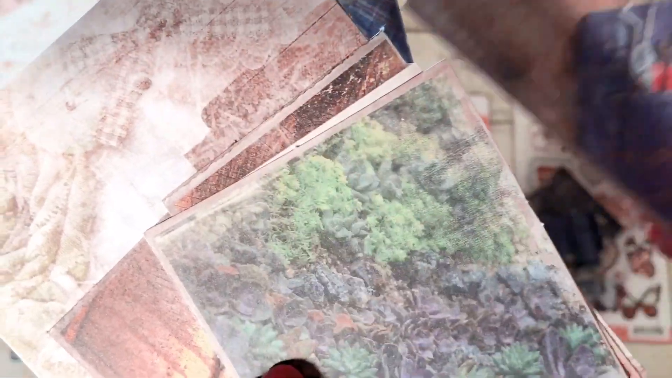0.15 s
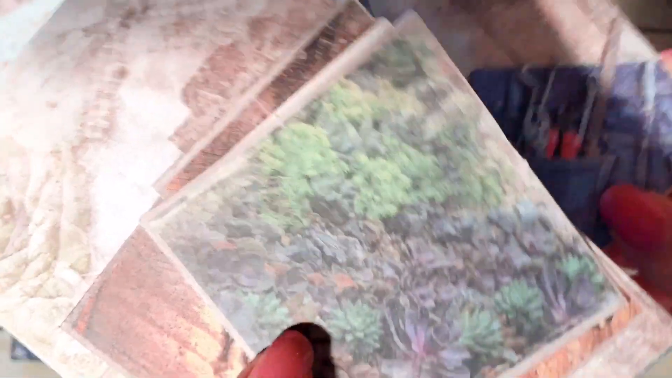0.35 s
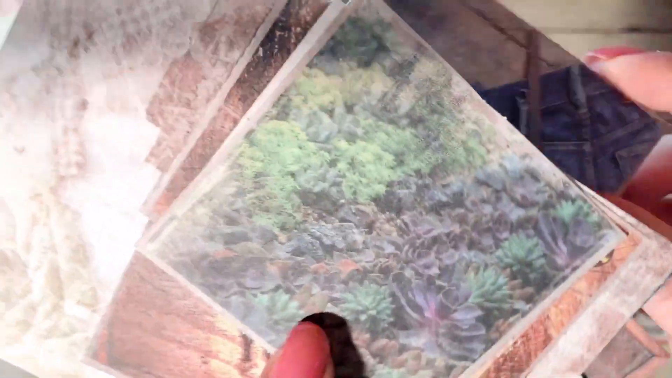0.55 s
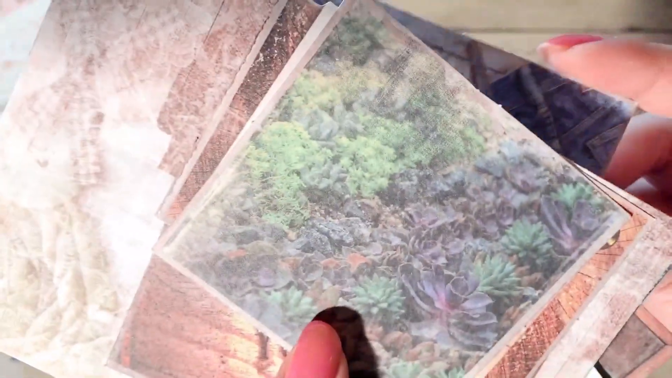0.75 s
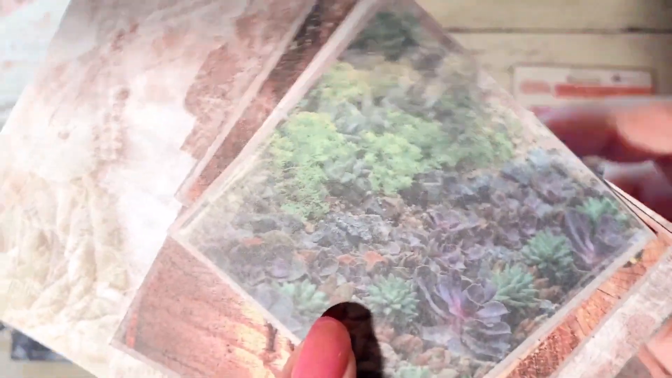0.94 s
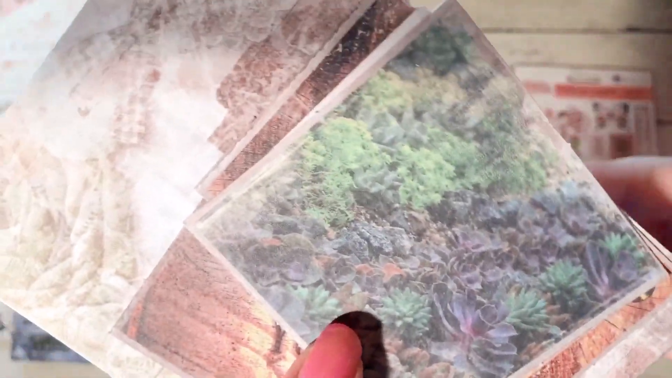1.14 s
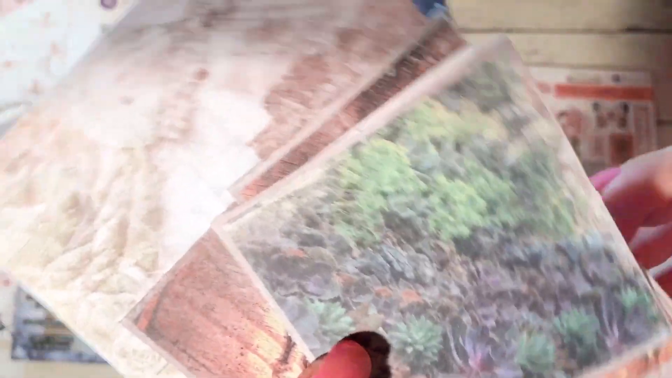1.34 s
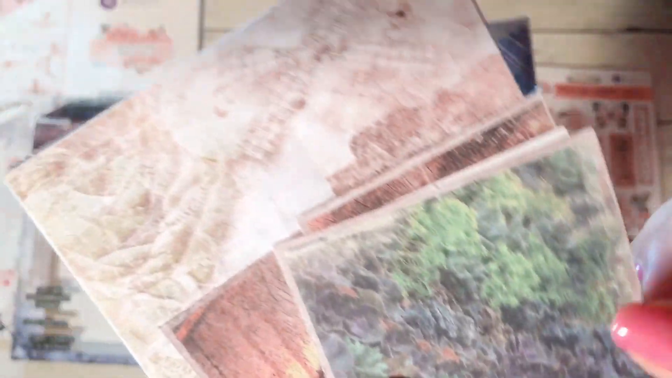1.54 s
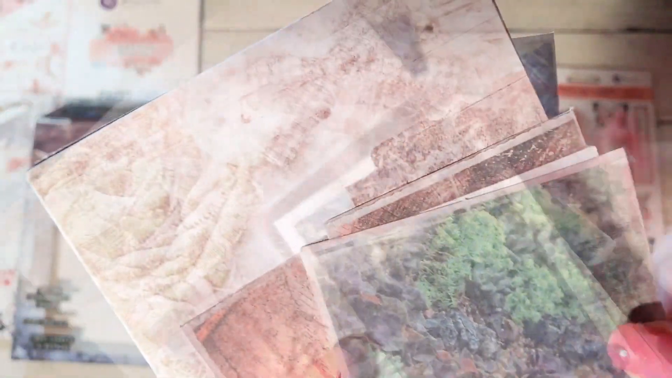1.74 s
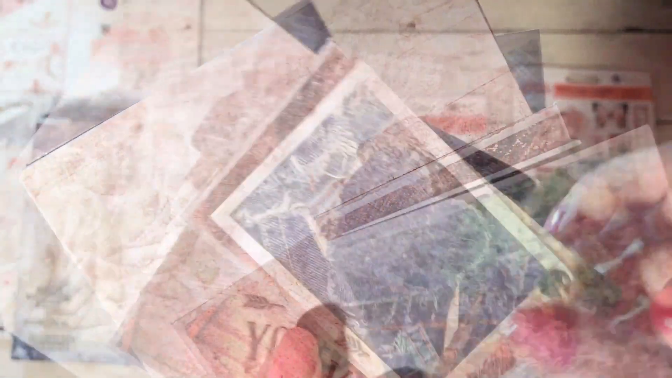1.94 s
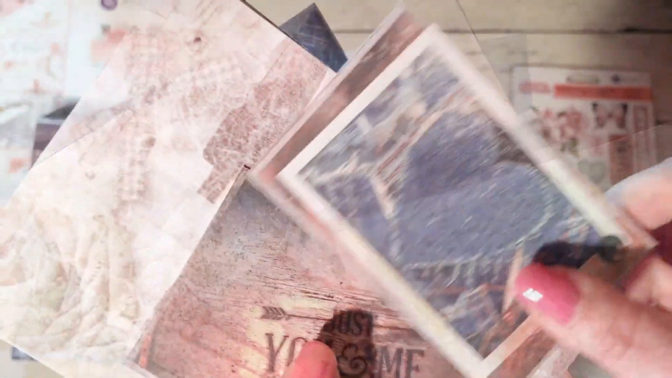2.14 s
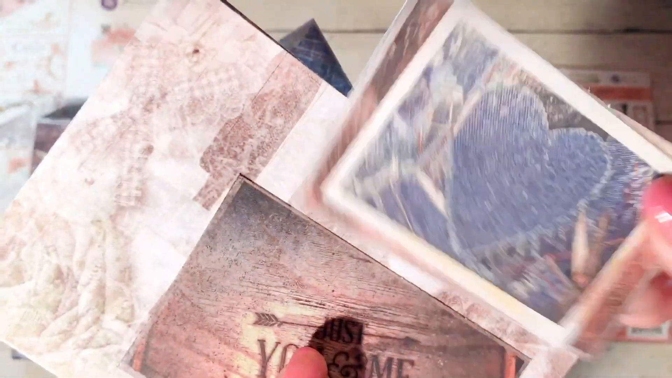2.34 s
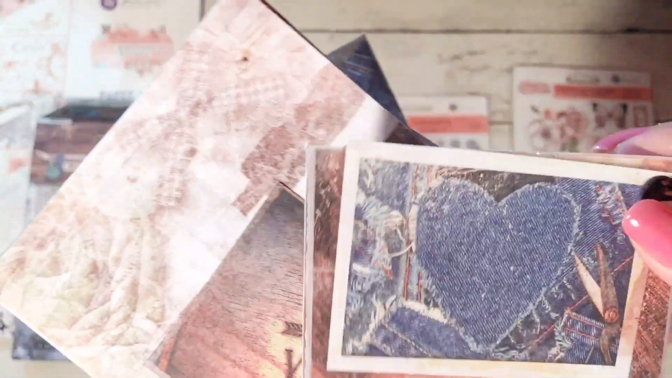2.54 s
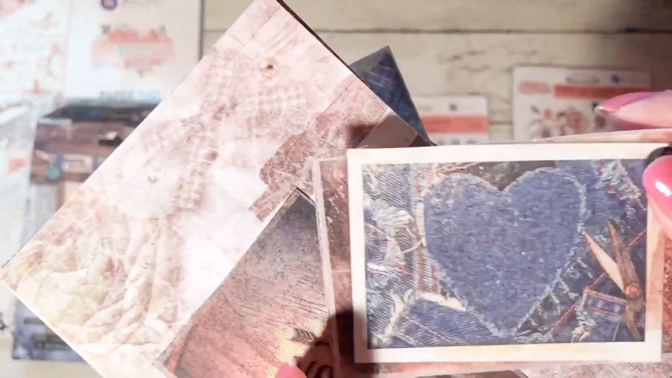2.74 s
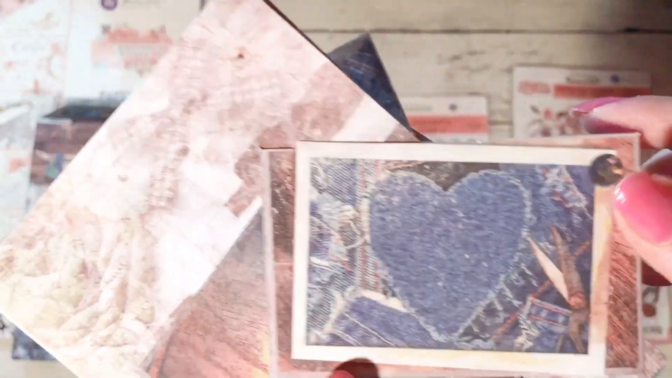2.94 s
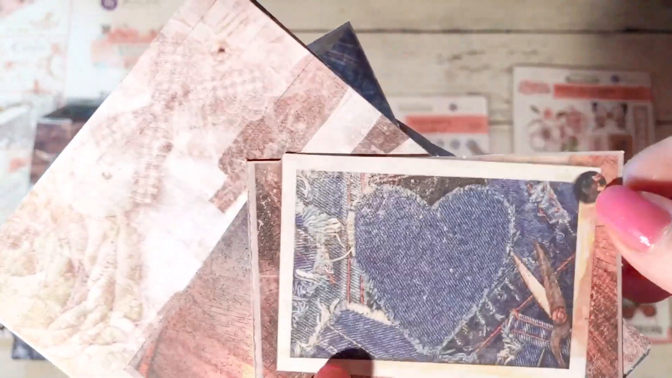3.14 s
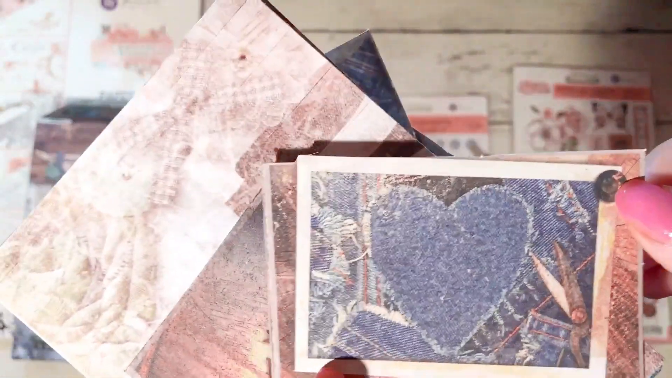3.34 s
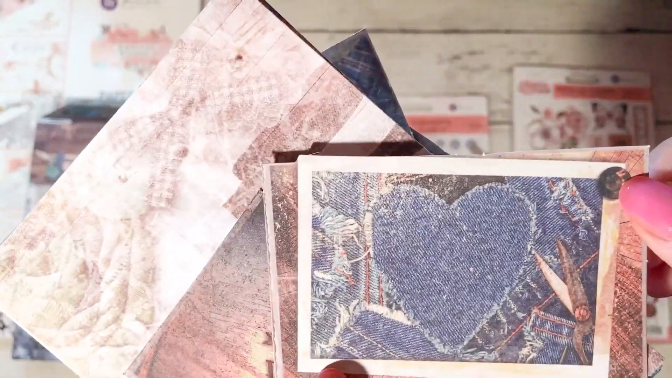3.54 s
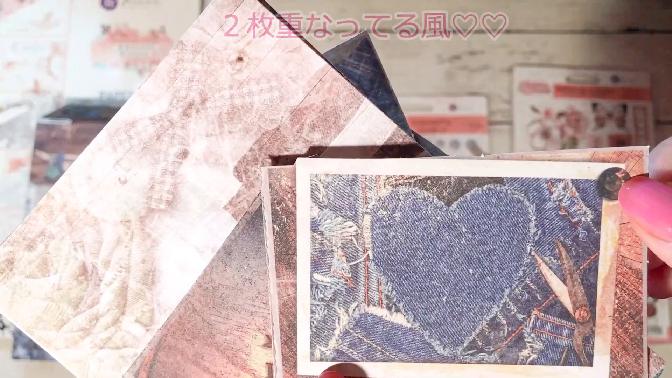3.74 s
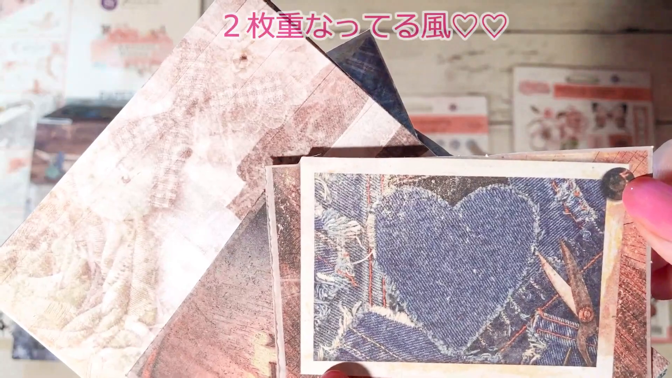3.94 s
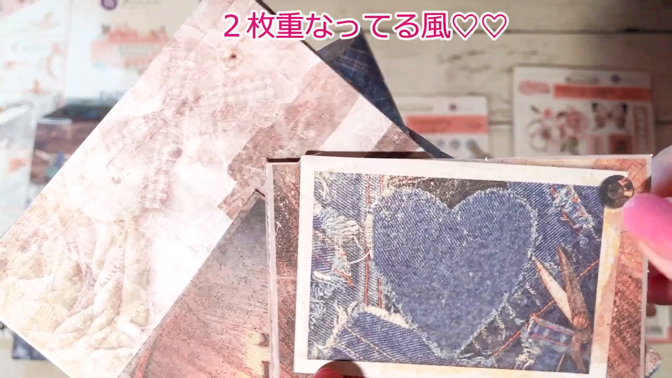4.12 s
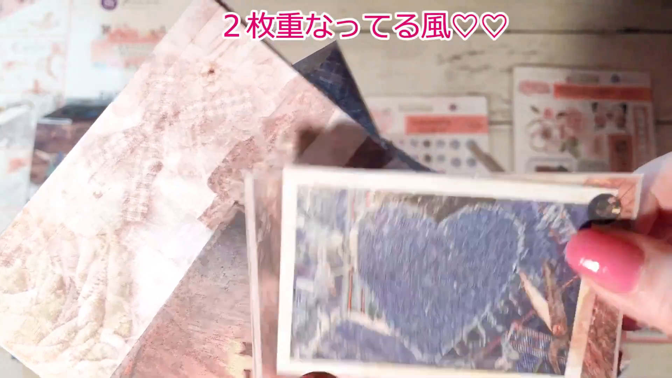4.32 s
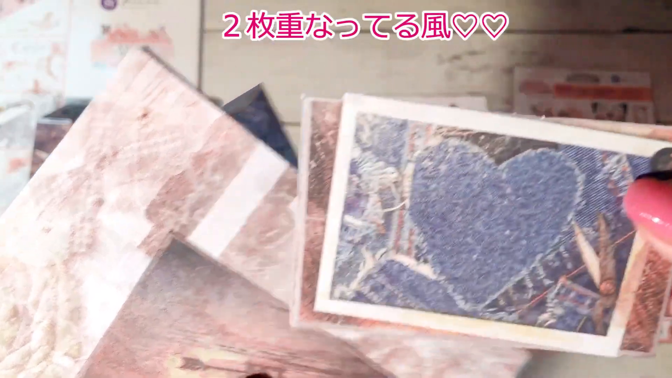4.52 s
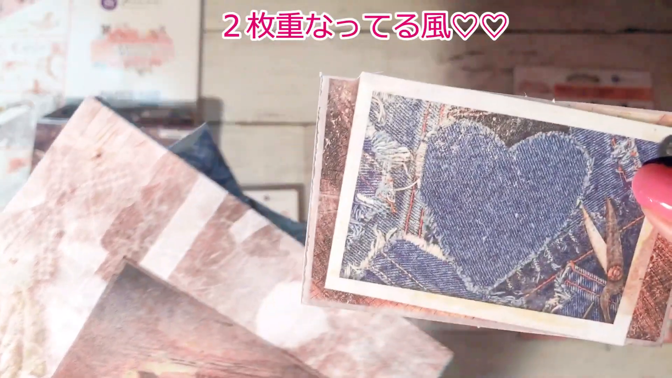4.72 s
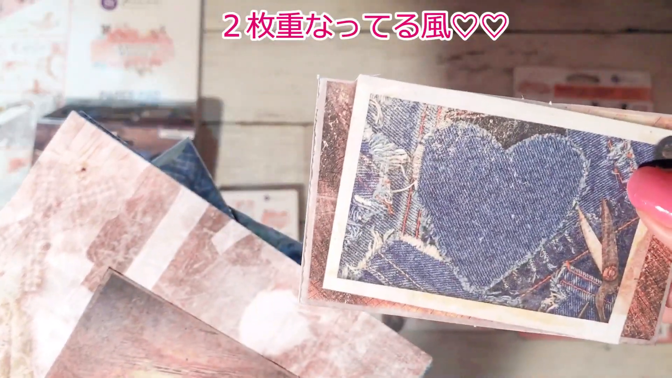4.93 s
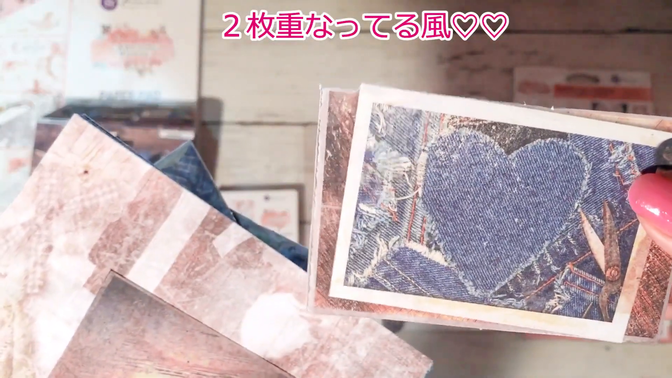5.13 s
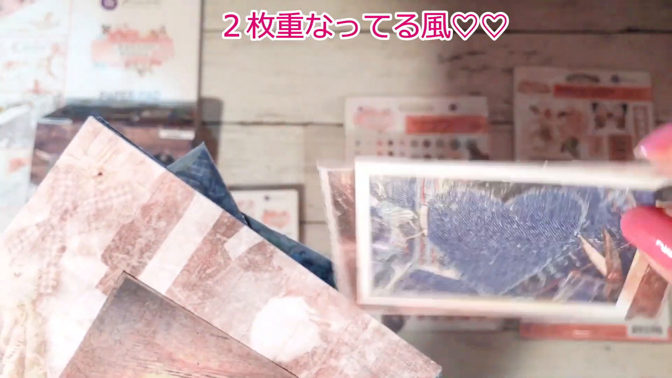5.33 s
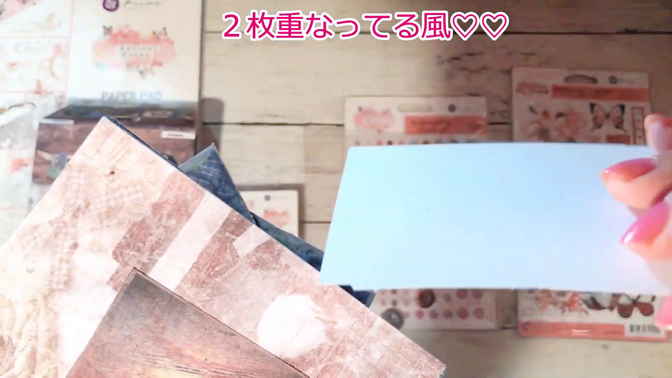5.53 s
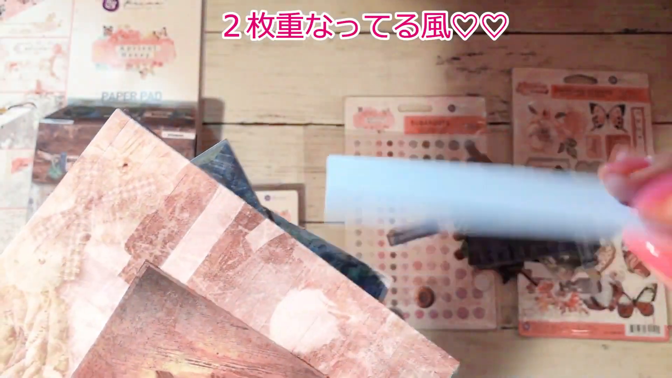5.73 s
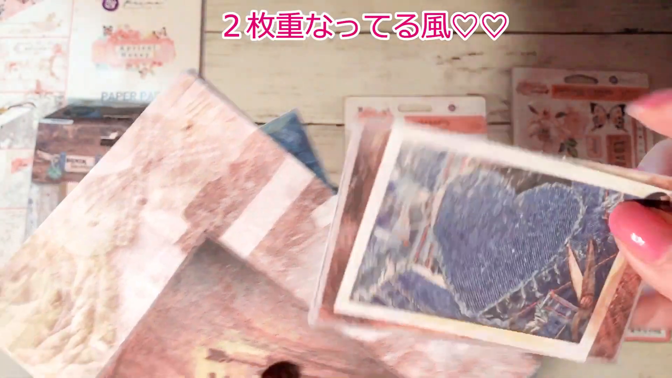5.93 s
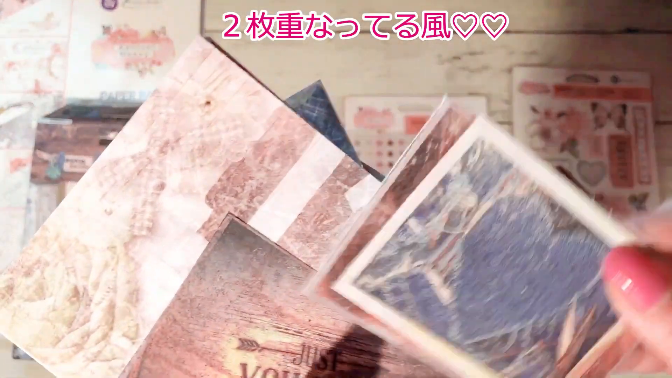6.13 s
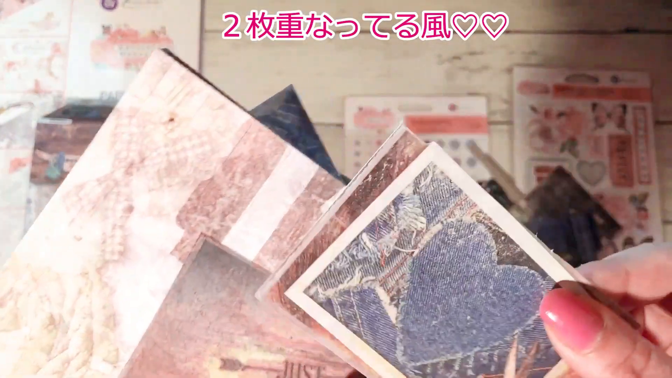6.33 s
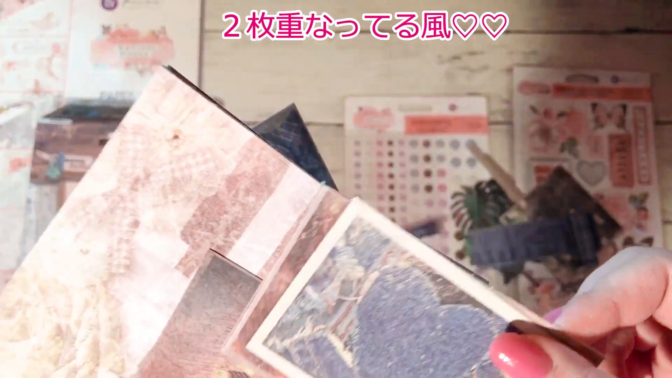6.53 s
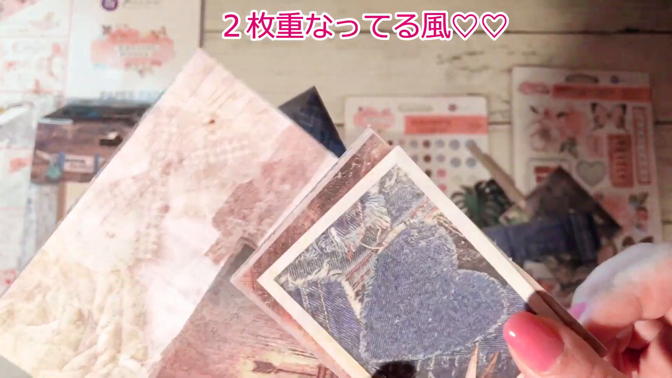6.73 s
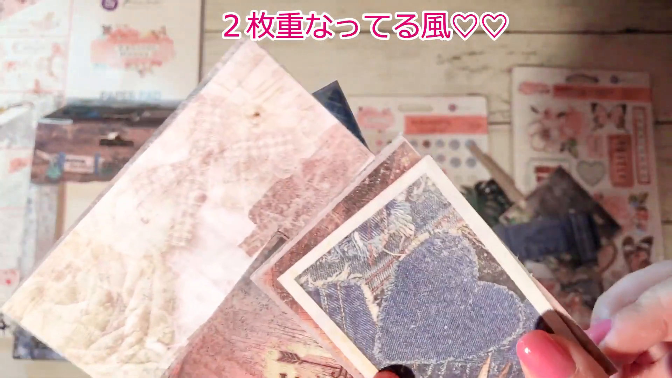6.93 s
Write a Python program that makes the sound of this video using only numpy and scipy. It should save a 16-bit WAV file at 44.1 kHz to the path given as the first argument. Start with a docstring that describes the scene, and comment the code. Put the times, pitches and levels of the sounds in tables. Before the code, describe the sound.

Close, dry handling of thick paper cards in a quiet room. Fingertips thump softly on the stack, and cards push between one another with small clicks. One swishes across another and corners spring free with crisp snaps. The handling drops to faint rubs, a brief scrape and a pause, then returns with light brushing, hissing slides, a sharp edge rasp and a few gentle taps.

```python
"""A few sheets of stiff card, fanned, slid and turned over by hand, close to the microphone in a small
quiet room. Rubbing fibres send dense tiny slips into the card; corners that flick free, edges that catch
and fingertips that bump send single impulses. All travel as bending waves, treble first and bass last,
and come back from the edges of the sheet. Desk and walls add a short tail over a low room tone."""
import sys
import numpy as np
from scipy import signal
from scipy.fft import rfft, irfft, next_fast_len
from scipy.io import wavfile

SR = 44100
rng = np.random.default_rng(int(sys.argv[2]) if len(sys.argv) > 2 else 0)


def put_to_file(sound):
    """Save the sound as 16-bit audio at rate SR, in the file named by the first command-line argument."""
    columns = np.atleast_2d(sound).T  # one column per channel
    safe = np.clip(columns, -1, 1)
    whole_steps = np.round(safe * 32767)
    wavfile.write(sys.argv[1], SR, whole_steps.astype(np.int16))


N = 311787
SHEET_SAMPLES = 4096  # length of the card's impulse response


def undb(db):
    """Decibels to gain."""
    return 10 ** (np.asarray(db) / 20)


def rms(x):
    """Root mean square."""
    return np.sqrt(np.mean(x ** 2))


def colour(points, hz):
    """Gain at hz, from (frequency [Hz], level [dB]) points joined on a log axis."""
    point_hz, db = np.transpose(points)
    return undb(np.interp(np.log(hz + 1), np.log(point_hz), db))


def resonances(rings, hz):
    """Gain at hz of a few (frequency [Hz], width [Hz], lift [dB]) peaks."""
    return undb(sum(db / (1 + (2 * (hz - centre) / width) ** 2) for centre, width, db in rings))


def filtered(x, gain):
    """Pass x through a gain that is a function of frequency."""
    size = next_fast_len(len(x) + SHEET_SAMPLES)
    hz = np.fft.rfftfreq(size, 1 / SR)
    return irfft(rfft(x, size) * gain(hz), size)[:len(x)]


def wander(rate_hz):
    """Smooth random wandering with a spread near 1."""
    steps = rng.standard_normal(4096)
    return np.interp(np.arange(N) / SR * rate_hz, np.arange(len(steps)), steps)


def add(out, start, sound):
    """Mix a sound in from a given sample on."""
    sound, start = sound[max(-start, 0):], max(start, 0)
    part = sound[:max(len(out) - start, 0)]
    out[start:start + len(part)] += part


def sheet(travel_ms, echo, loss_db, shortest, longest, treble_loss_db, count=10):
    """Frequency response of the card from one contact point: a direct bending wave and edge echoes."""
    hz = np.fft.rfftfreq(SHEET_SAMPLES, 1 / SR)
    spread = (np.arange(count)[:, None] + rng.random((count, 1))) / count
    paths = shortest + (longest - shortest) * spread  # multiples of the direct path
    damping_db = (loss_db + treble_loss_db * hz / 10000) * (paths - 2)
    echoes = echo * rng.choice([-1, 1], (count, 1)) * undb(-damping_db)
    # bending waves speed up with the root of frequency, so every impulse becomes a falling chirp
    phase = 4 * np.pi * travel_ms * np.sqrt(hz / 1000)
    response = np.exp(-1j * phase) + np.sum(echoes * np.exp(-1j * paths * phase), axis=0)
    return response / np.sqrt(1 + np.sum(echoes ** 2, axis=0))


def slips(grain_db, judder_db, judder_hz):
    """Fibres catching and letting go: tiny impulses of unequal size, in uneven bunches."""
    sizes = undb(grain_db * np.minimum(rng.exponential(size=N), 7))
    touching = rng.random(N) < 0.15
    return rng.standard_normal(N) * sizes * touching * undb(judder_db * wander(judder_hz))


def through_card(force, hop=4096):
    """The contact point moves on, so the faint pattern of edge echoes keeps changing."""
    fade = np.sqrt(signal.get_window("hann", 2 * hop))
    padded = np.pad(force, (hop, 2 * hop))
    out = np.zeros(len(padded))
    for start in range(0, N + hop, hop):
        piece = padded[start:start + 2 * hop] * fade
        if piece.any():
            # sheets pressed together damp each other: little treble returns from the edges
            card = sheet(travel_ms=1.8, echo=0.32, loss_db=1.5, shortest=2, longest=8, treble_loss_db=8)
            add(out, start, signal.fftconvolve(piece, irfft(card)))
    return out[hop:hop + N]


def stroke_gains(strokes):
    """Gains of hiss and body: each stroke speeds up, holds and slows to rest; overlaps add in power."""
    hiss_power, body_power = np.zeros(N), np.zeros(N)
    for start, attack, hold, release, hiss_db, body_db in strokes:
        t = np.arange(int((attack + hold + release) * SR)) / SR
        rise = np.clip(t / attack, 0, 1)
        fall = np.clip(1 - (t - attack - hold) / release, 0, 1)
        gain = undb(hiss_db) * rise ** 0.79 * fall ** 1.78
        add(hiss_power, int(start * SR), gain ** 2)
        add(body_power, int(start * SR), (gain * undb(body_db)) ** 2)
    pressure = undb(0.7 * wander(rate_hz=30))  # the hand wavers
    return pressure * np.sqrt(hiss_power), pressure * np.sqrt(body_power)


def rub(strokes, spectrum, force, body_trim_db, rings=()):
    """Slips ring the card: fibre hiss above 2.5 kHz, body below, shifted in level by body_trim_db."""
    hiss_gain, body_gain = stroke_gains(strokes)
    moving = hiss_gain > 0
    sound = filtered(through_card(force * moving), lambda hz: colour(spectrum, hz) * resonances(rings, hz))
    body = filtered(sound, lambda hz: 1 / (1 + (hz / 2500) ** 8))
    hiss = sound - body
    body_gain = body_gain * undb(body_trim_db)
    return hiss_gain * hiss / rms(hiss[moving]) + body_gain * body / rms(body[moving])


# Fingertip strokes: (time [s], attack [s], hold [s], release [s], hiss [dB], body over hiss [dB])
BRUSHES = [ (0.0, 0.0038, 0.0036, 0.052, -42, -10), (5.183, 0.011, .008, .02, -57, -15),
           (5.215, 0.02, .05, .03, -56, -16), (5.28, 0.025, 0.11, .07, -47.5, -17),
           (5.46, 0.016, .004, .022, -56.5, -15), (5.523, 0.044, 0.011, 0.036, -47.5, -8.5),
           (5.585, .02, .02, 0.1, -63.5, -5), (5.783, 0.016, 0.011, 0.038, -51, -11.5),
           (5.845, 0.012, .004, .015, -56.5, -6.5), (5.895, 0.013, .01, .03, -62, -12),
           (5.925, 0.021, .005, 0.021, -51.5, -14), (6.15, 0.017, 0.019, .06, -40, -26)]
# Skin on card, heard close: (frequency [Hz], relative level [dB])
BRUSH_COLOUR = [(80, -13), (400, -0.5), (900, -1.5), (2000, -1), (3200, -1.5), (4500, -1), (8000, 0.5),
                (10200, -3.5), (15500, -8)]


def brushes():
    """Soft fingertips brush the card as they turn it over."""
    force = slips(grain_db=-0.5, judder_db=-1.5, judder_hz=200)
    return rub(BRUSHES, BRUSH_COLOUR, force, body_trim_db=4.5)


# The quiet room at the microphone: (frequency [Hz], relative level [dB])
ROOM_TONE = [(25, -26), (50, -3), (90, -2), (150, -1.5), (230, -3.5), (380, -5.5), (560, -7.5),
             (900, -11.5), (1500, -16.5), (3000, -20.5), (7000, -23), (15500, -28.5)]


def room_tone(level_db=-61.5):
    """Low steady murmur of the room under microphone hiss."""
    tone = filtered(rng.standard_normal(N), lambda hz: colour(ROOM_TONE, hz))
    return undb(level_db) * tone / rms(tone)


# Where the thump, knock and tick weights of a contact apply: (frequency [Hz])
CONTACT_BANDS = [370, 2200, 3300]
# What the struck card radiates to the microphone, on top of those weights: (frequency [Hz], gain [dB])
CONTACT_COLOUR = [(40, 30), (90, 39.5), (150, 38), (280, 38.5), (650, 35.5), (1300, 34.5), (2800, 25.5),
                  (4100, 29), (8500, 25.5), (10200, 15), (15500, 8)]
# Hollow knock and bite of the card: (frequency [Hz], width [Hz], lift [dB])
CONTACT_RINGS = [(1180, 500, 2.5), (3680, 960, 3.5)]


def contact(time, band_db, ring_hz, scuff_ms, scuff=0.65, ring_lift_db=9, lead=512):
    """One scuffed impulse, which the card spreads into tick, knock and late thump."""
    hz = np.fft.rfftfreq(SHEET_SAMPLES, 1 / SR)
    ms = (np.arange(SHEET_SAMPLES) - lead) / SR * 1000
    # fibres tear loose around the instant of release; the longer they do, the softer the attack
    fibres = rng.standard_normal(SHEET_SAMPLES) * np.exp(-np.abs(ms) / (2 * scuff_ms))
    force = (ms == 0) + scuff * fibres / np.sqrt(SR / 1000)
    force /= np.linalg.norm(force)
    radiated = colour(list(zip(CONTACT_BANDS, band_db)), hz) * colour(CONTACT_COLOUR, hz)
    ringing = resonances([(ring_hz, ring_hz / 2, ring_lift_db)] + CONTACT_RINGS, hz)
    card = sheet(travel_ms=3.1, echo=0.3, loss_db=3.5, shortest=1.5, longest=7, treble_loss_db=-0.5)
    out = np.zeros(N)
    add(out, int(time * SR) - lead, irfft(rfft(force) * radiated * ringing * card))
    return out


# Edges catching: (time [s], knock weight [dB])
CATCHES = [(0.01, -48.5), (0.199, -60), (0.87, -44), (0.885, -50), (1.026, -47), (2.757, -44.5),
           (3.102, -57), (3.113, -54), (4.115, -59.5), (5.314, -52.5), (5.39, -49.5), (6.048, -44.5),
           (6.246, -49), (6.741, -52.5), (6.941, -52.5)]


def catches():
    """An edge catches lightly and rings the stack."""
    return sum(contact(time, (db - 6, db, db - 1), ring_hz=2230, scuff_ms=0.93) for time, db in CATCHES)


# Fingertips landing: (time [s], thump weight [dB], ring pitch [Hz])
BUMPS = [(0.035, -42.5, 243), (0.045, -47, 110), (0.098, -40.5, 199), (2.39, -50, 298), (3.21, -58, 303),
         (6.941, -50, 278)]


def bumps():
    """Soft fingertips bump the stack: a thump with little knock or tick."""
    return sum(contact(time, (db, db - 34, db - 20), hz, scuff_ms=3.4) for time, db, hz in BUMPS)


# Corners flicking: (time [s], thump weight [dB], ring pitch [Hz], knock weight [dB], tick weight [dB])
SNAPS = [ (0.2994, -37.5, 252, -32.5, -43.5), (0.4072, -47.5, 577, -39, -40.5),
         (0.602, -47, 397, -37.5, -39), (0.9835, -44, 300, -46, -44), (1.2638, -45, 1950, -35, -41),
         (1.268, -40.5, 109, -63, -44.5), (2.5481, -36, 378, -30, -26), (2.555, -41, 255, -42, -42),
         (2.7651, -50, 300, -39, -31), (2.768, -46, 524, -30, -37.5), (2.778, -38, 90, -40, -48),
         (2.784, -38, 420, -33.5, -34), (2.7919, -42.5, 254, -37, -46), (3.079, -40.5, 290, -32.5, -44),
         (3.099, -54, 300, -54, -36), (6.142, -53.5, 302.4, -31.5, -36), (6.327, -46, 182, -42, -46)]


def snaps():
    """A corner scuffs briefly and springs free with a sharp snap."""
    return sum(contact(time, (thump_db, knock_db, tick_db), hz, scuff_ms=0.56)
               for time, thump_db, hz, knock_db, tick_db in SNAPS)


# Strokes into the stack: (time [s], attack [s], hold [s], release [s], hiss [dB], body over hiss [dB])
PUSHES = [ (0.3, 0.013, 0.03, 0.075, -50, 1.5), (0.711, 0.041, 0.026, 0.12, -44, -1),
          (0.82, 0.066, .15, 0.068, -48, -4), (1.085, 0.034, 0.11, 0.11, -52.5, -1),
          (1.28, 0.018, 0.0095, 0.056, -51.5, -7.5), (1.67, 0.038, .02, 0.26, -64, -2),
          (1.8, 0.17, 0.04, .035, -62, -6), (2.79, .015, 0.022, .06, -52.5, -2.5),
          (2.83, 0.094, 0.016, 0.062, -46.5, -2), (3.225, 0.083, 0.088, 0.054, -61.5, -1),
          (3.405, 0.019, 0.0096, 0.041, -56, -3), (4.19, 0.062, 0.022, .05, -62, 1.5),
          (4.29, 0.031, 0.0055, 0.13, -58.5, -10), (6.765, 0.051, 0.0074, 0.054, -55, -4.5),
          (6.85, .015, 0.022, 0.058, -58, 1.5), (6.91, .028, 0.026, 0.12, -56.5, -0.5),
          (7.01, 0.039, .03, .03, -50.5, -5)]
# Card between cards, heard close: (frequency [Hz], relative level [dB])
PUSH_COLOUR = [(60, -15), (250, -3.5), (620, -6), (1200, 0.5), (1700, -1), (2200, 2.5), (2900, -4.5),
               (5200, -4), (8500, -5), (10500, -12.5), (15500, -16)]
# Resonances of the stack: (frequency [Hz], width [Hz], lift [dB])
STACK_RINGS = [(2210, 700, 0.5), (4900, 600, 3)]


def pushes():
    """A card is pushed in between the others, and the stack sings faintly."""
    force = slips(grain_db=0.5, judder_db=0.8, judder_hz=170)
    return rub(PUSHES, PUSH_COLOUR, force, body_trim_db=-0.3, rings=STACK_RINGS)


# Edge strokes: (time [s], attack [s], hold [s], release [s], hiss [dB], body over hiss [dB], pitch [Hz])
RASPS = [ (0.408, 0.063, 0.0045, 0.0069, -47.5, -9, 3300), (0.608, 0.006, .005, 0.071, -48, -5, 3300),
         (0.676, 0.0087, 0.0042, 0.026, -56, 4.5, 2260), (4.389, 0.033, .006, 0.036, -43, -8, 3920),
         (4.435, 0.019, 0.026, .012, -49.5, -8, 4980), (6.304, 0.011, 0.0097, 0.014, -32.5, -2, 1580)]
# A cut edge on card, heard close: (frequency [Hz], relative level [dB])
RASP_COLOUR = [(60, -8), (280, 13.5), (680, -2), (1200, 9.5), (2700, -2.5), (3600, -1.5), (6000, -2.5),
               (8500, -4.5), (10000, -13), (15500, -11)]
# Resonances of a card held stiff by its rasping edge: (frequency [Hz], width [Hz], lift [dB])
EDGE_RINGS = [(1130, 310, 6.5), (1920, 270, 8), (3460, 400, 4), (4420, 450, 5.5), (4760, 310, 5),
              (7350, 360, 9)]


def rasps(width_hz=330, lift_db=11.5):
    """A cut edge rasps along its neighbour, each edge singing at a pitch of its own."""
    force = slips(grain_db=1.1, judder_db=0.7, judder_hz=260)
    out = np.zeros(N)
    for *stroke, pitch_hz in RASPS:
        rings = EDGE_RINGS + [(pitch_hz, width_hz, lift_db)]
        out += rub([stroke], RASP_COLOUR, force, body_trim_db=-1.5, rings=rings)
    return out


# Flat strokes: (time [s], attack [s], hold [s], release [s], hiss [dB], body over hiss [dB])
GLIDES = [ (2.105, 0.11, 0.023, 0.022, -42.5, -8.5), (2.22, 0.037, 0.13, 0.12, -45.5, -5),
          (2.513, 0.011, 0.022, 0.03, -49, -6), (2.655, 0.022, .004, 0.027, -59, -1),
          (3.067, 0.0097, 0.018, 0.1, -43, -2.5), (5.965, 0.046, 0.057, 0.13, -49.5, -7.5),
          (6.12, 0.041, 0.088, 0.015, -43.5, -3.5), (6.245, 0.025, 0.033, 0.068, -49, 0.5),
          (6.34, 0.014, .003, 0.017, -46.5, -0.5), (6.36, .015, .035, 0.042, -58, 4),
          (6.447, 0.0074, 0.011, .03, -52, -0.5), (6.465, 0.043, 0.014, 0.03, -42, -6),
          (6.53, 0.022, 0.068, .03, -53.5, -4), (6.62, 0.029, .068, .025, -46.5, -7)]
# Face on face, heard close: (frequency [Hz], relative level [dB])
GLIDE_COLOUR = [(60, -6.5), (280, -2.5), (680, -6), (1200, -2), (2300, 0), (3100, -2), (4300, 5.5),
                (6500, 2.5), (8800, 1), (10200, -9), (15500, -7.5)]


def glides():
    """One face glides over another, its fibres slipping in a bright hiss."""
    force = slips(grain_db=-0.64, judder_db=1.53, judder_hz=190)
    return rub(GLIDES, GLIDE_COLOUR, force, body_trim_db=-1.0)


def room(x, t60_s=0.25, delay_s=0.004):
    """Desk and near walls add a short, dull tail, faint this close to the card."""
    t = np.arange(SR // 2) / SR
    tail = rng.standard_normal(len(t)) * undb(-60 * t / t60_s) * (t > delay_s)
    tail /= np.linalg.norm(tail)
    tail = filtered(tail, lambda hz: colour([(300, 0.5), (2500, -7.5), (12000, -2.5)], hz))
    return x + undb(-19) * signal.fftconvolve(x, tail)[:N]


def scene():
    """The card in the small room, at one close microphone."""
    card = brushes() + catches() + bumps() + snaps() + pushes() + rasps() + glides()
    return (room(card) + room_tone())[None]


def record(dry):
    """The microphone loses the deepest bass and the recorder cuts the top."""
    low_cut = signal.butter(4, 42, "high", fs=SR, output="sos")
    high_cut = signal.ellip(12, 0.1, 80, 15900, fs=SR, output="sos")
    return signal.sosfilt(high_cut, signal.sosfilt(low_cut, dry))


dry = scene()
out = record(dry)
put_to_file(out)
```